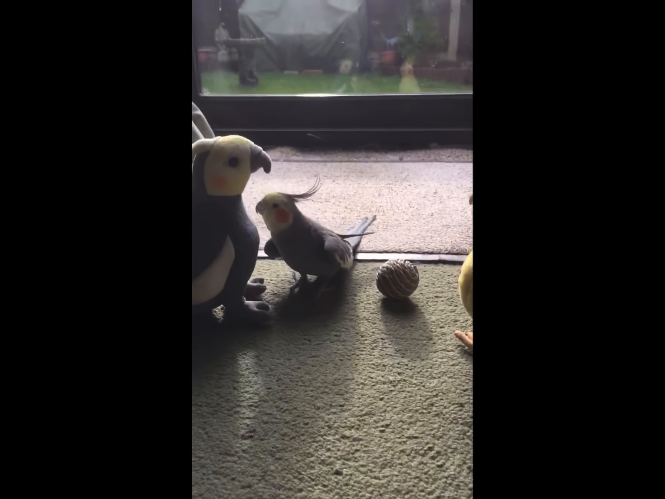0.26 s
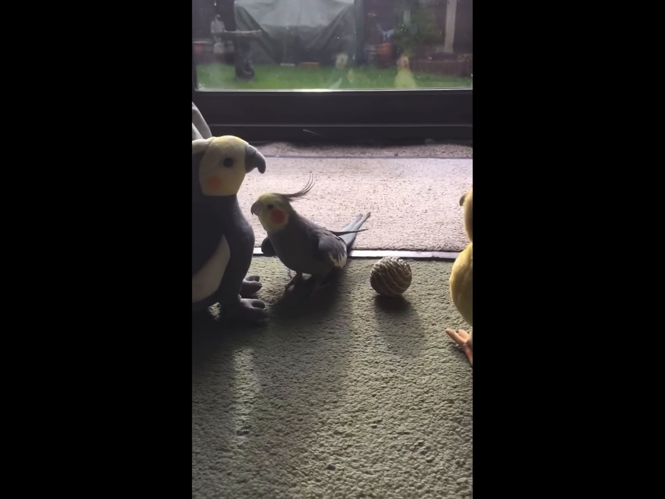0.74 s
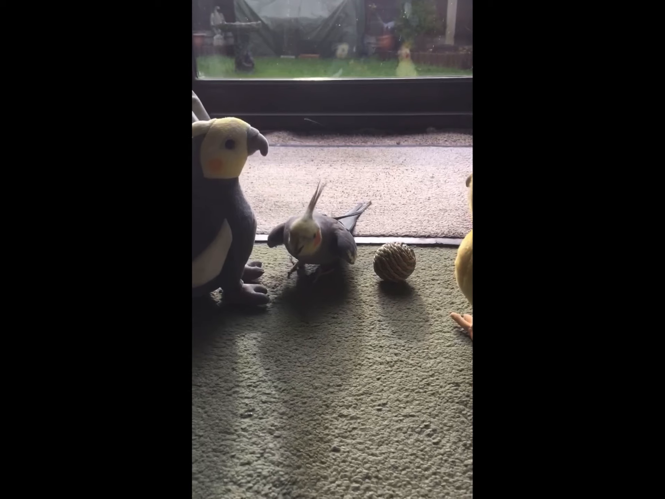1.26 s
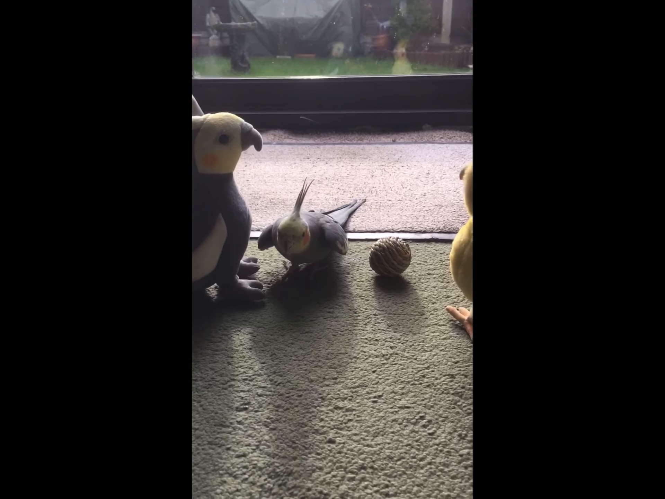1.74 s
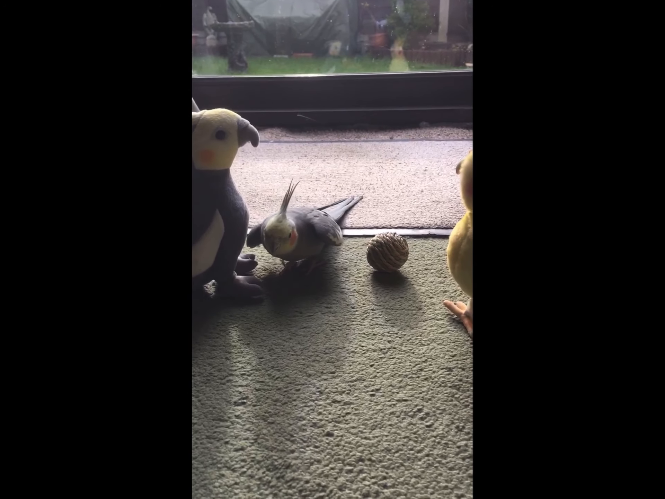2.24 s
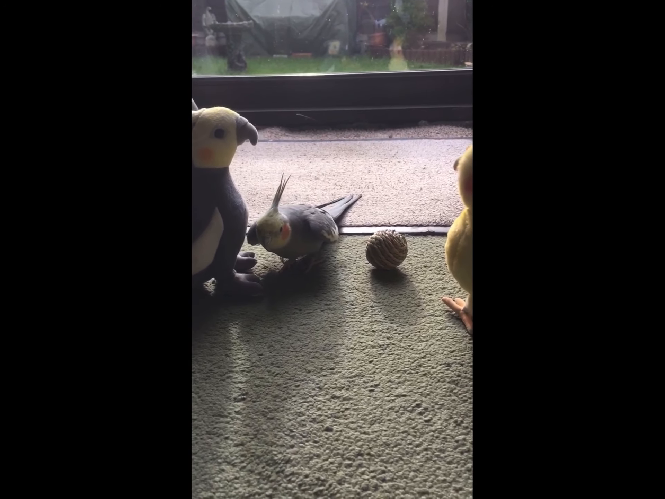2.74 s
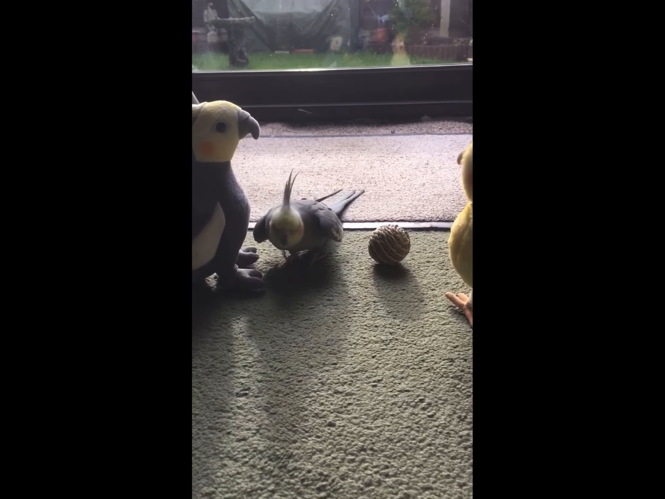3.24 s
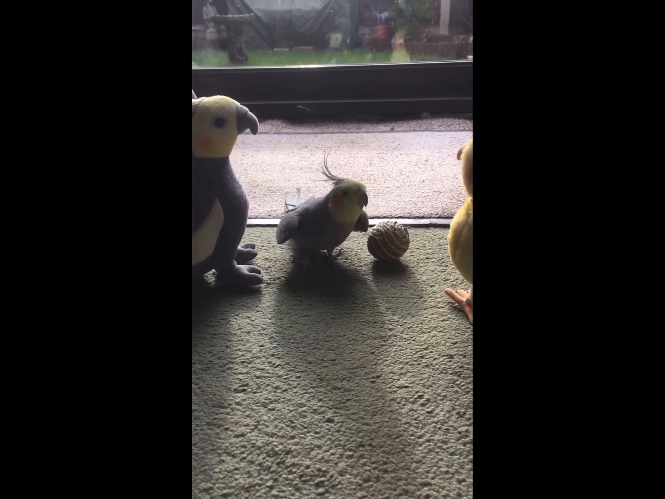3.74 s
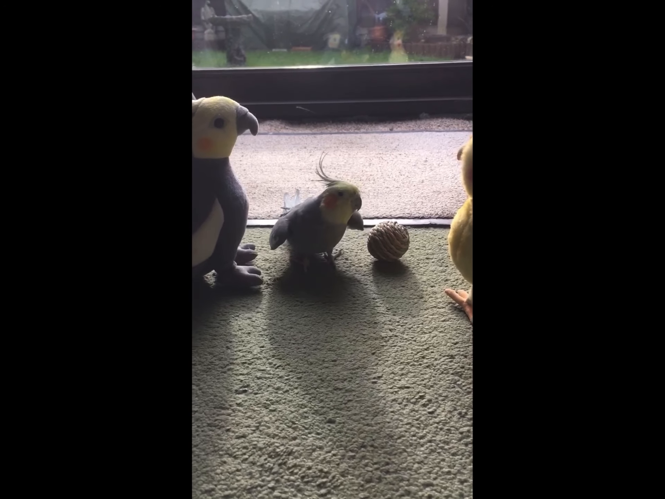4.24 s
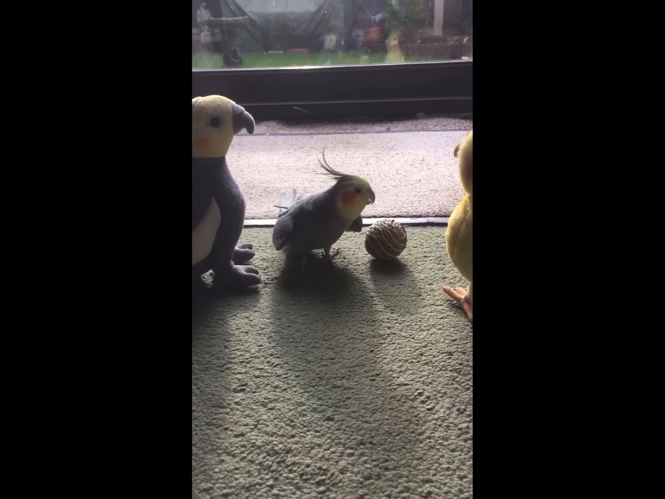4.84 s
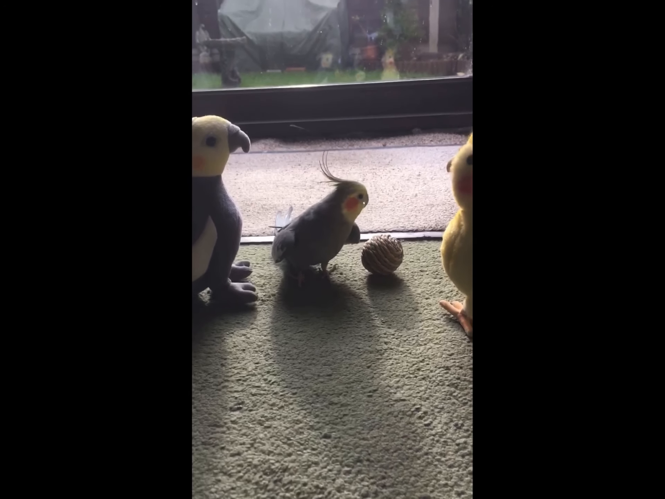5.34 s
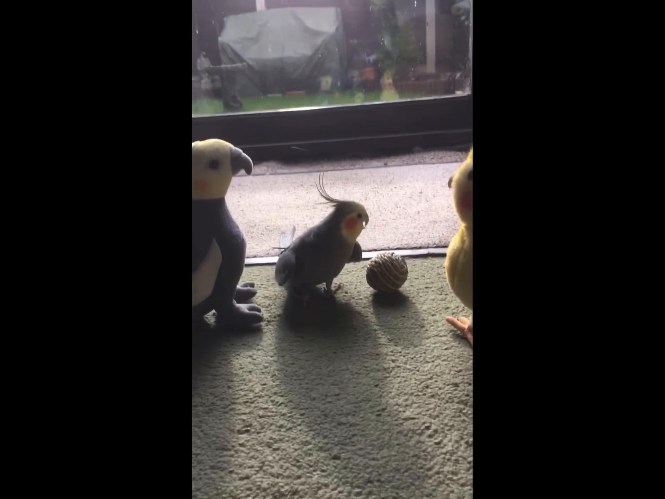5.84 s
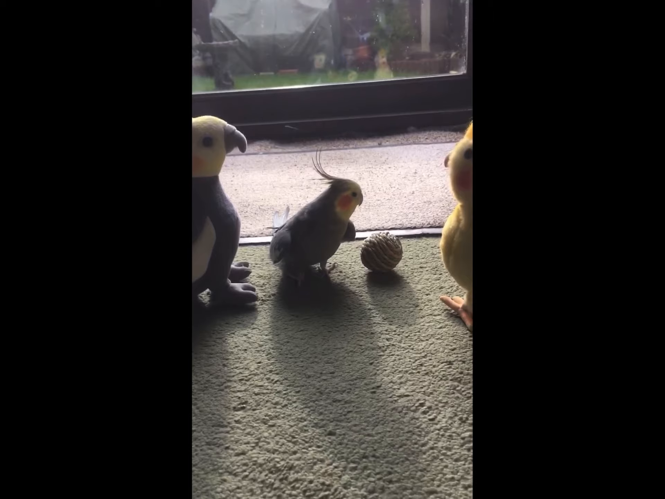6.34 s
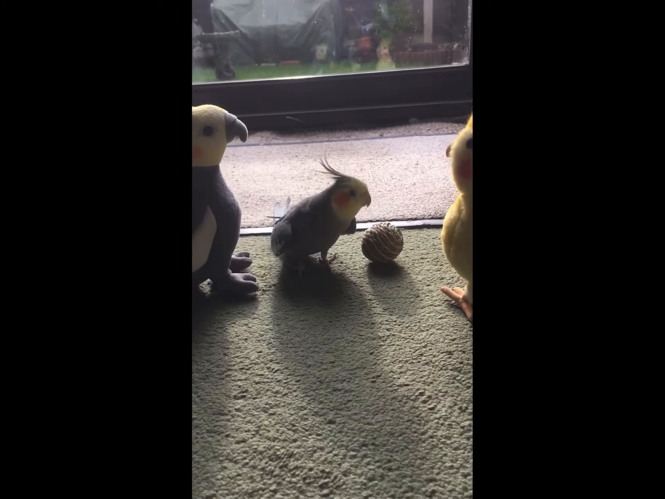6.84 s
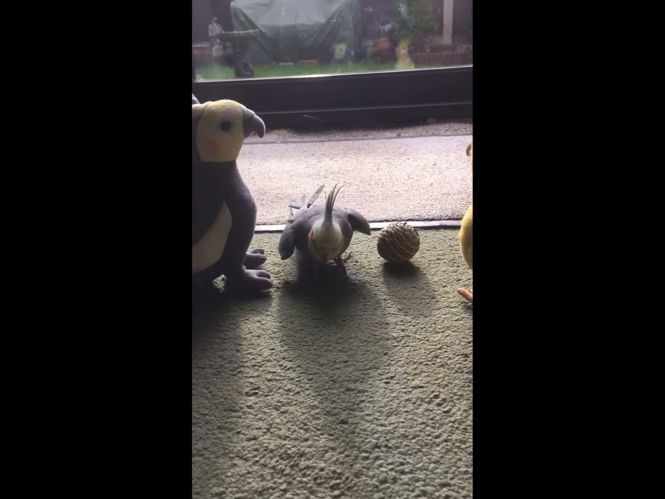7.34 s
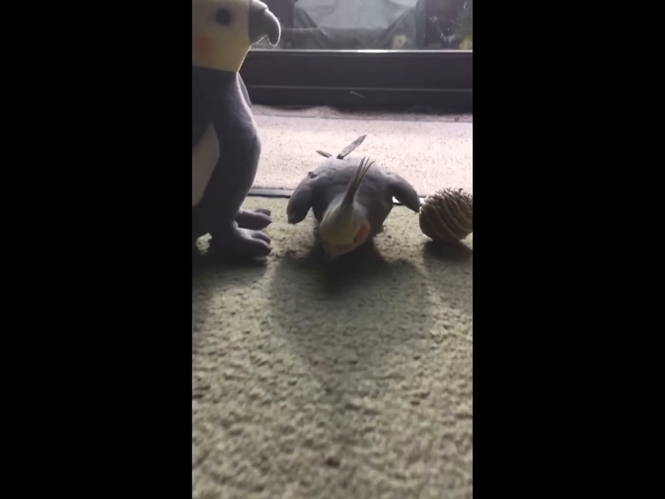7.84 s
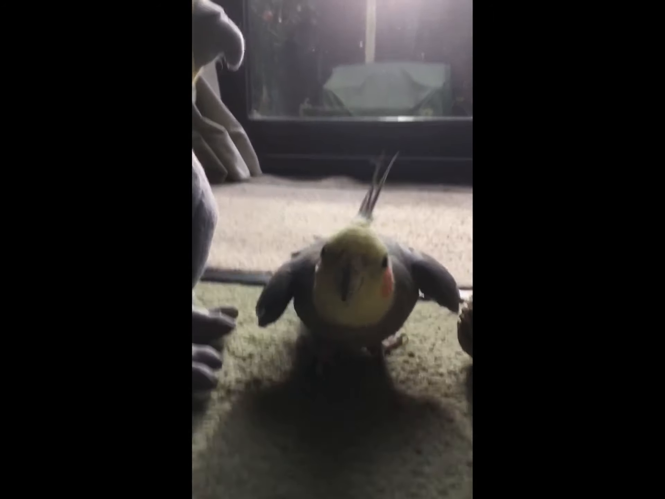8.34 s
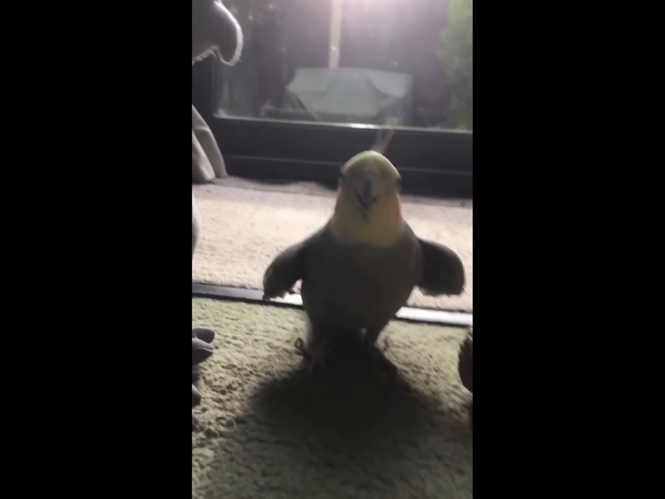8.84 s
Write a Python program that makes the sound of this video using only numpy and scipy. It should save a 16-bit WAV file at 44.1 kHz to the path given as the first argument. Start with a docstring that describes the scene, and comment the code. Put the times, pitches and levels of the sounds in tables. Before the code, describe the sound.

A cockatiel whistles in a small room with a slight, short echo, over a faint steady appliance hum and low room noise. The tail of a whistle is heard at the very start. The bird then repeats one half-second phrase: a low nasal lead-in, sometimes raspy, a loud clear note arching up and down, and a bright rising note that snaps shut. Phrases begin at about 0.7, 1.6, 2.8, 3.5, 4.5, 5.3, 6.4, 7.2 and 8.1 seconds, with short pauses between them. A tiny handling tick comes at 5 seconds. From about 7.7 seconds cloth rustles softly as the microphone moves closer, and a faint low drone swells. Soft bumps on the microphone come around 8.4 seconds, during the loudest, closest and driest whistle. At 9 seconds another nasal lead-in begins and is cut off.

```python
"""A cockatiel whistles one phrase over and over: a low nasal lead-in, a loud clear arch and a bright
rising note that snaps shut. Its syrinx makes a harmonic tone, at times rasping, shaped by throat and
beak and reflected by a glass door and the walls of a small room. An appliance hums behind it.
Near the end the microphone is moved closer, with a rustle of cloth and a soft bump."""
import sys
import numpy as np
from scipy import signal
from scipy.fft import rfft, irfft
from scipy.io import wavfile
from scipy.ndimage import uniform_filter1d

SR = 44100
rng = np.random.default_rng(int(sys.argv[2]) if len(sys.argv) > 2 else 0)


def bounce(signal):
    """Save signal as a 16-bit WAV file at the path given by the first command-line argument."""
    frames = np.transpose(np.atleast_2d(signal))
    limited = np.clip(frames, -1, 1)
    pcm = np.round(limited * 32767).astype(np.int16)
    wavfile.write(sys.argv[1], SR, pcm)


N = 400869
TIME_S = np.arange(N) / SR
CUTOFF_HZ = 15750
IDLE_HZ, IDLE_DB, IDLE_OVERTONES_DB, IDLE_TREBLE_DB = 1004, -37, -57, -64.5

# Room noise. Each row: frequency in Hz, relative density in dB.
NOISE_SPECTRUM = [(15, -38.5), (28, -9), (45, 1), (100, -3), (170, -2.5), (270, -12.5), (340, -14.5),
                  (460, -17.5), (630, -14), (1000, -18), (2000, -29.5), (3300, -33), (5500, -40.5),
                  (14000, -40.5)]
# Appliance hum. Each row: frequency in Hz, level in dB.
HUM_LINES = [(75.4, -65.5), (150.7, -68.5), (215.3, -67), (253, -71), (613.7, -73.5), (672.9, -76)]
# Room drone, swelling nearer the door. Each row: time in seconds, level in dB.
DRONE_LEVELS = [(7.3, -64), (7.8, -56.5), (8.3, -57.5), (8.7, -53), (9.09, -51.5)]
# Cloth sliding as the microphone moves. Each row: time in seconds, level in dB.
CLOTH_LEVELS = [(7.4, -100), (7.72, -51), (7.82, -55.5), (7.88, -48.5), (8.02, -49), (8.12, -52),
                (8.22, -45), (8.3, -47.5), (8.38, -42), (8.44, -43), (8.52, -50.5), (8.62, -54.5),
                (8.8, -59.5), (8.95, -64), (9.09, -43)]
# Cloth colour. Each row: frequency in Hz, relative density in dB.
CLOTH_SPECTRUM = [(120, -35), (200, -2), (283, 5), (322, -6.5), (439, -4), (681, 2.5), (1520, -0.5),
                  (3060, -1.5), (5010, -10), (15900, -21.5)]
# Knocks: a small one as a phrase ends at 5.02 s, then knocks of the hand. Each row: start in seconds, initial
# level in dB, frequency in Hz, T60 in seconds.
KNOCKS = [(5.021, -35.5, 760, 0.018), (8.325, -35.5, 98, .09), (8.41, -31, 79.9, 0.044),
          (8.417, -27.5, 567, 0.016), (8.448, -26.5, 84.4, .07), (8.451, -42.5, 153, 0.068)]
# Early reflections off door and walls. Each row: delay in seconds, gain in dB.
REFLECTIONS = [(.0031, -34), (.0074, -14), (0.0109, -6.5)]
# Feed to the room as the bird turns and the microphone nears. Each row: time in seconds, gain in dB.
ROOM_SEND = [(0, -0.5), (1.2, -8), (2, -7.5), (3.1, -7.5), (3.9, -9), (4.9, -6), (5.7, -4.5), (6.8, -7),
             (7.6, -8.5), (8.5, -17.5), (9.09, -10.5)]
# Diffuse tail; the beak throws the treble at the walls.
# Each row: frequency in Hz, T60 in seconds, relative level in dB.
ROOM_TAIL = [(1000, 0.13, -4.5), (2350, 0.18, 6), (4000, 0.17, -5.5), (6960, 0.22, 2.5), (14000, 0.1, 3.5)]
# Windpipe and beak resonances on high notes. Each row: frequency in Hz, gain in dB.
HIGH_NOTE_THROAT = [(3000, -4.5), (3600, -0.5), (4100, -3), (4700, -28.5), (5400, -17.5), (6200, -21),
                    (7200, -33), (8800, -34.5), (10300, -29), (12000, -19.5), (14000, -25.5),
                    (15800, -31.5)]
# The same with the throat wide, on low nasal notes. Each row: frequency in Hz, gain in dB.
LOW_NOTE_THROAT = [(2000, -9), (2700, -13), (3300, -7), (4100, -8.5), (4700, -21.5), (5500, -22.5),
                   (6800, -30.5), (8200, -35), (9500, -37.5), (11000, -24), (12500, -26.5), (14000, -28.5),
                   (15800, -46)]
# Rasps, alternate cycles strong and weak.
# Each row: start in seconds, end in seconds, depth 0-1, open-beak gain in dB.
RASP_SPANS = [(.77, 0.848, 0.06, 3.5), (0.905, 0.977, 0.05, -8), (1.617, 1.763, 0.06, 7.5),
              (3.074, 3.094, 0.01, -9.5), (3.552, 3.696, 0.01, 11.5), (4.511, 4.596, 0.03, -4),
              (4.637, 4.687, 0.15, -15), (5.321, 5.422, 0.02, 7), (7.218, 7.343, 0.06, 23),
              (8.502, 8.527, 0.05, -3)]
# Unbroken stretches of tone. Each row: start in seconds, end in seconds, opening level in dB.
PHRASE_SPANS = [(-.3, .076, -45), (0.739, 1.278, -55.5), (1.596, 2.118, -46), (2.752, 3.27, -43),
                (3.533, 4.062, -42), (4.486, 5.02, -43), (5.289, 5.799, -47.5), (6.386, 6.44, -48),
                (6.481, 6.943, -37.5), (7.202, 7.707, -42.5), (8.137, 8.702, -38), (8.986, 9.2, -38)]
# Nasal lead-in swells. Each row: crest time, rise and fall in seconds, crest pitch in Hz,
# then fundamental, overtone and treble levels in dB.
LEAD_IN_SWELLS = [(0.801, 0.029, 0.061, 1123, -43, -38, -43.5), (.939, 0.032, 0.045, 1334, -31, -47.5, -44),
                  (1.679, 0.048, 0.095, 1321, -34.5, -26.5, -26),
                  (1.76, 0.05, 0.032, 1379, -31.5, -33.5, -31),
                  (2.877, 0.016, 0.037, 1145, -29.5, -54, -43),
                  (2.938, 0.06, 0.043, 1290, -29.5, -43.5, -42.5),
                  (3.626, .048, 0.097, 1374, -35.5, -22.5, -23),
                  (3.722, .054, 0.017, 1574, -27, -24.5, -31),
                  (4.553, 0.04, 0.033, 1163, -34.5, -29.5, -36),
                  (4.676, 0.034, 0.041, 1420, -31, -45.5, -44),
                  (5.365, 0.054, .15, 1299, -36.5, -30.5, -35.5),
                  (5.445, 0.0865, 0.027, 1399, -32, -34, -32.5), (6.388, .02, 0.036, 1073, -42.5, -63, -57),
                  (6.488, .02, 0.067, 1100, -48, -46.5, -52), (6.611, 0.06, 0.047, 1257, -31, -50, -50),
                  (7.297, .056, 0.092, 1250, -34, -34, -26.5),
                  (7.358, 0.072, 0.041, 1394, -28.5, -33.5, -23),
                  (8.243, 0.035, 0.037, 1095, -29, -34.5, -39), (8.362, 0.059, .046, 1320, -23, -44, -31),
                  (9.11, 0.058, .05, 1354, -32.5, -14.5, -34)]
# Loud clear arches. Each row: start and length in seconds, shoulder and top pitch in Hz,
# then fundamental, overtone and treble base levels in dB.
ARCH_NOTES = [(.993, 0.14, 2160, 2435, -19.5, -27.5, -21.5), (1.828, .152, 2073, 2490, -20, -23.5, -23.5),
              (3.004, 0.15, 2110, 2551, -18.5, -23.5, -21.5), (3.787, .139, 2098, 2380, -18.5, -28, -26.5),
              (4.733, 0.14, 2145, 2420, -21, -27, -25.5), (5.509, .146, 2090, 2505, -20.5, -28, -28),
              (6.667, .144, 2157, 2436, -19.5, -27, -27), (7.435, 0.13, 2114, 2430, -19, -25.5, -23.5),
              (8.423, 0.14, 2114, 2563, -12, -29, -13)]
# An arch leaps to its shoulder, climbs and drops. Each row: share of length, share of lift from idle,
# share of climb from shoulder to top, then fundamental, overtone and treble offsets in dB.
ARCH_CONTOUR = [(0, .05, 0.03, -18, -33, -38.5), (.085, .12, 0, -10.5, -28, -35),
                (.19, .79, 0.01, -18, -27.5, -26), (.26, 1, 0.02, -10, -17.5, -9.5),
                (.33, 1, .35, -5.5, -6, -6), (.52, 1, .8, -2, 1, -5.5), (.665, 1, 1, -2, -1, 0),
                (.715, .95, 0.99, -1.5, -5.5, 0.5), (.765, .75, 1, -14.5, -25.5, -13.5),
                (.86, .16, 0.96, -17, -33, -31.5), (.92, .07, 0.99, -15, -34, -35.5),
                (1, 0.03, 0.93, -22, -34, -36.5)]
# Bright rising notes, held to the end of the phrase. Each row: start in seconds, shoulder and top
# pitch in Hz, then fundamental, overtone and treble base levels in dB.
RISING_NOTES = [(-.055, 1718, 2062, -29.5, -24.5, -40.5), (1.146, 1748, 2051, -24.5, -19, -27),
                (1.983, 1790, 2098, -23, -20, -33), (3.156, 1979, 2072, -24, -18, -27.5),
                (3.936, 1675, 1977, -24.5, -14, -27.5), (4.886, 1720, 2041, -24, -21, -35),
                (5.674, 1813, 2029, -24.5, -23, -38.5), (6.812, 1885, 2035, -23.5, -19.5, -37.5),
                (7.588, 1818, 1912, -17, -24.5, -28.5), (8.577, 1808, 2104, -19.5, -12.5, -20)]
# A rising note lifts to its shoulder, climbs on and snaps shut. Each row: as in ARCH_CONTOUR.
RISING_CONTOUR = [(0, .12, 0.06, -10, -36, -25.5), (.06, .25, 0.05, -9.5, -36.5, -25.5),
                  (.14, .78, 0, -11, -33, -18), (.23, 1.05, 0.12, -13.5, -28, -6.5),
                  (.33, 1, 0, -3.5, -18, -5.5), (.55, 0.99, .4, -5, -12, -3.5), (.73, 1, 1, -6, -8, -2),
                  (.86, 0.98, 0.98, -1.5, -1, -0.5), (.94, .81, 1, -7.5, 1.5, -4.5),
                  (1, 0.46, 1, -34, -26.5, -9.5)]


def from_db(db):
    """Decibels to gain."""
    return 10 ** (np.asarray(db) / 20)


def unit_rms(x):
    """Scale to unit power."""
    return x / np.sqrt(np.mean(x ** 2) + 1e-20)


def columns_at(rows, t):
    """Interpolate each later column where the first equals t."""
    knots, *columns = np.transpose(rows)
    return [np.interp(t, knots, column) for column in columns]


def at_hz(rows, hz, column=1):
    """Interpolate a column on a log-frequency axis."""
    columns = np.transpose(rows)
    return np.interp(np.log(np.maximum(hz, 1)), np.log(columns[0]), columns[column])


def band_noise(low_hz, high_hz, size):
    """Band-passed white noise."""
    sos = signal.butter(2, [low_hz, high_hz], "band", fs=SR, output="sos")
    return signal.sosfilt(sos, rng.standard_normal(size))


def drift(rate_hz, size):
    """Smooth random wander, rms 1."""
    hz = np.arange(size // 2 + 1) * SR / size
    return unit_rms(irfft(rfft(rng.standard_normal(size)) / (1 + (hz / rate_hz) ** 2), size))


def coloured_noise(spectrum):
    """Steady noise of the given spectrum, rms 1."""
    hz = np.arange(N // 2 + 1) * SR / N
    return unit_rms(irfft(rfft(rng.standard_normal(N)) * from_db(at_hz(spectrum, hz)), N))


def appliance_hum(waver=0.004):
    """An appliance hums in slightly unsteady lines."""
    hum = np.zeros(N)
    for hz, db in HUM_LINES:
        phase = 2 * np.pi * np.cumsum(hz * (1 + waver * drift(5.5, N))) / SR
        hum += np.sqrt(2) * from_db(db) * np.sin(phase)
    return hum


def room_noise(floor_db=-56.15):
    """Steady noise floor and a low drone that swells near the end."""
    drone = from_db(columns_at(DRONE_LEVELS, TIME_S)[0]) * unit_rms(band_noise(200, 310, N))
    return from_db(floor_db) * coloured_noise(NOISE_SPECTRUM) + drone


def handling(grain_db=1.0):
    """Cloth fibres catch and slip; a small knock ends one phrase, and the hand knocks the housing, which thuds
    briefly."""
    cloth_db = columns_at(CLOTH_LEVELS, TIME_S)[0] + grain_db * drift(120, N)
    out = from_db(cloth_db) * coloured_noise(CLOTH_SPECTRUM)
    for start_s, db, hz, t60_s in KNOCKS:
        age_s = np.maximum(TIME_S - start_s, 0)
        decay_db = 60 * np.minimum(age_s / t60_s, 2)
        out += from_db(db - decay_db) * np.sin(2 * np.pi * hz * age_s)
    return out


def room(x, direct_db=-0.85, build_s=0.0022, tail_gain=1.29):
    """Direct sound, near reflections off door and walls, then a short diffuse tail."""
    t = TIME_S[:SR // 2]
    edges_hz = np.geomspace(400, 18000, 9)
    response = np.zeros(len(t))
    for low_hz, high_hz in zip(edges_hz, edges_hz[1:]):
        t60_s, db = [at_hz(ROOM_TAIL, np.sqrt(low_hz * high_hz), column) for column in (1, 2)]
        response += band_noise(low_hz, high_hz, len(t)) * from_db(db - 60 * t / t60_s)
    response *= np.clip(t / build_s, 0, 1)
    response *= tail_gain / np.sqrt(np.sum(response ** 2))
    for delay_s, db in REFLECTIONS:
        response[int(delay_s * SR)] += from_db(db)
    send = from_db(columns_at(ROOM_SEND, TIME_S)[0])
    return from_db(direct_db) * x + signal.fftconvolve(x * send, response)[:N]


def hump(t, widths_s, squareness):
    """Rounded hump of height 1 at t = 0; widths are (rise, fall)."""
    return np.exp(-np.abs(t / np.where(t < 0, *widths_s)) ** squareness)


def lead_in(t, opening_db, sharp_hz=60, settle_s=0.0087, gather_s=0.24):
    """A low, nearly pure idle tone opens sharp and gathers strength; nasal swells push it up."""
    age_s = t - t[0]
    idle_hz = IDLE_HZ + sharp_hz * np.exp(-age_s / settle_s)
    idle_db = np.interp(age_s, [0, gather_s], [opening_db, IDLE_DB])
    idle = np.array(np.broadcast_arrays(idle_hz, idle_db, IDLE_OVERTONES_DB, IDLE_TREBLE_DB))
    curves = idle
    for crest_s, rise_s, fall_s, *crest in LEAD_IN_SWELLS:
        if t[0] - rise_s < crest_s < t[-1]:
            bend = hump(t - crest_s, (rise_s, fall_s), squareness=2.1)
            # The fundamental outlasts the bend; the overtones fade ahead of it.
            body = hump(t - crest_s, (1.15 * rise_s, 1.9 * fall_s), squareness=3.4)
            bright = hump(t - crest_s, (1.286 * rise_s, 0.72 * fall_s), squareness=3.4)
            push = np.array([bend, body, bright, bright])
            curves = np.maximum(curves, idle + push * (np.array(crest)[:, None] - idle))
    return curves


def note(contour, progress, shoulder_hz, top_hz, *base_db):
    """A practised contour sung at its own pitch and strength."""
    lift, climb, *offsets_db = columns_at(contour, progress)
    aim_hz = shoulder_hz + climb * (top_hz - shoulder_hz)
    pitch_hz = IDLE_HZ + lift * (aim_hz - IDLE_HZ)
    return [pitch_hz, *(db + offset_db for db, offset_db in zip(base_db, offsets_db))]


def melody(t, opening_db):
    """Lead-in, arch, rising note: curves of pitch in Hz and fundamental, overtones, treble in dB."""
    curves = lead_in(t, opening_db)
    for start_s, length_s, *sung in ARCH_NOTES:
        if t[0] < start_s < t[-1]:
            progress = (t - start_s) / length_s
            curves = np.where(t > start_s, note(ARCH_CONTOUR, progress, *sung), curves)
    for start_s, *sung in RISING_NOTES:
        if t[0] < start_s < t[-1]:
            progress = (t - start_s) / (t[-1] - start_s)
            curves = np.where(t > start_s, note(RISING_CONTOUR, progress, *sung), curves)
    return [uniform_filter1d(curve, size=130) for curve in curves]


def rasping(t):
    """Smoothed rasp depth and open-beak gain in dB."""
    rasp, beak_db = np.zeros((2, len(t)))
    for start_s, end_s, depth, db in RASP_SPANS:
        inside = (t > start_s) & (t < end_s)
        rasp[inside] += depth
        beak_db[inside] += db
    return uniform_filter1d(rasp, size=600), uniform_filter1d(beak_db, size=900)


def syrinx(t, opening_db, flutter_db=2.0, pop_db=-62, pop_s=0.0079, edge_s=0.0005):
    """One phrase of harmonic tone; the harder the syrinx closes, the more overtones pass the throat."""
    size = len(t)
    pitch_hz, fundamental_db, overtones_db, treble_db = melody(t, opening_db)
    rasp, open_beak_db = rasping(t)
    high_note = np.clip((pitch_hz - 1550) / 200, 0, 1)
    softness = (1 - high_note) * np.clip((-32 - overtones_db) / 15, 0, 1)
    waver = 0.005 * drift(70, size)
    jitter = (0.0015 + 0.08 * rasp) * drift(450, size)
    phase = 2 * np.pi * np.cumsum(pitch_hz * (1 + waver + jitter)) / SR

    def overtone_gain(hz, beak_hz=6900, beak_width_hz=1700, soft_db_per_octave=-7.5):
        """Drive shaped by throat and beak; soft low notes lose their upper overtones."""
        drive_db = overtones_db + (treble_db - overtones_db) * np.clip((hz - 6500) / 3000, 0, 1)
        throat_db = high_note * at_hz(HIGH_NOTE_THROAT, hz)
        throat_db += (1 - high_note) * at_hz(LOW_NOTE_THROAT, hz)
        beak_db = open_beak_db * np.exp(-((hz - beak_hz) / beak_width_hz) ** 2)
        soft_db = soft_db_per_octave * softness * np.clip(np.log2(hz / 3000), 0, 1)
        return from_db(drive_db + throat_db + beak_db + soft_db) * (hz < CUTOFF_HZ)

    tone = from_db(fundamental_db) * (np.sin(phase) + 0.68 * rasp * np.sin(phase / 2))
    for k in range(2, 16):
        flutter = from_db(flutter_db * drift(80, size))
        tone += overtone_gain(k * pitch_hz) * flutter * np.sin(k * phase)
        # Unequal cycles put lines halfway between the harmonics.
        half_line = rasp * overtone_gain((k - 0.5) * pitch_hz) * (1 + 0.12 * drift(150, size))
        tone += half_line * np.sin((k - 0.5) * phase)
    tone *= 1 + 0.55 * rasp * unit_rms(band_noise(200, 750, size))  # rasp frays each line
    air_puffs = unit_rms(band_noise(3500, 20000, size)) * (1 + np.cos(phase))  # one per cycle
    hiss = (0.06 + 2.7 * rasp) * overtone_gain(hz=11500) * air_puffs
    age_s = t - t[0]
    pop = from_db(pop_db) * np.exp(-age_s / pop_s) * unit_rms(band_noise(1000, 4500, size))
    gate = np.clip(np.minimum(age_s, t[-1] - t) / edge_s, 0, 1)
    return np.sqrt(2) * (tone + hiss + pop) * gate


def cockatiel():
    """The bird whistles its phrases one after another."""
    out = np.zeros(N)
    for start_s, end_s, opening_db in PHRASE_SPANS:
        samples = np.arange(int(start_s * SR), int(end_s * SR))
        heard = (samples >= 0) & (samples < N)
        out[samples[heard]] += syrinx(samples / SR, opening_db)[heard]
    return out


def scene():
    """Bird in the room, over hum, room noise and rustle; mono."""
    return (room(cockatiel()) + appliance_hum() + room_noise() + handling())[None]


def record(dry, low_cut_hz=36):
    """The microphone drops the deepest bass; the top is cut steeply."""
    high_pass = signal.butter(4, low_cut_hz, "high", fs=SR, output="sos")
    low_pass = signal.ellip(10, 0.1, 80, CUTOFF_HZ, fs=SR, output="sos")
    return signal.sosfilt(low_pass, signal.sosfilt(high_pass, dry))


dry = scene()
out = record(dry)
bounce(out)
```